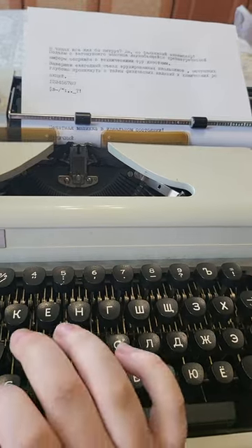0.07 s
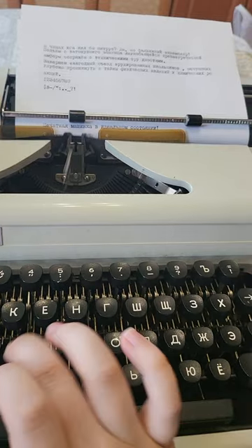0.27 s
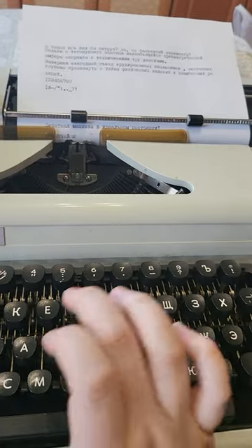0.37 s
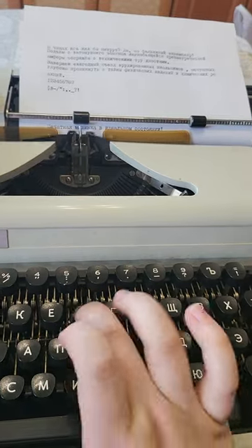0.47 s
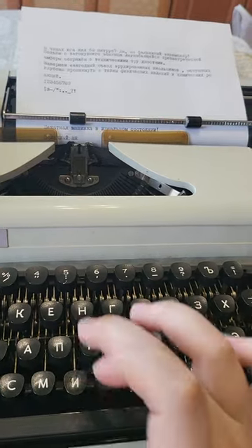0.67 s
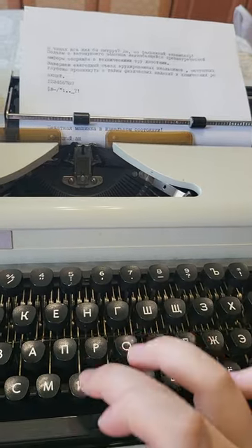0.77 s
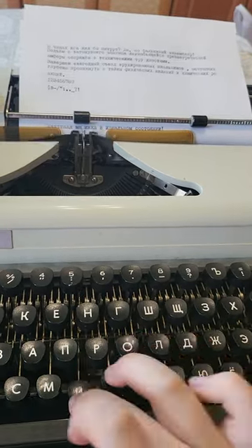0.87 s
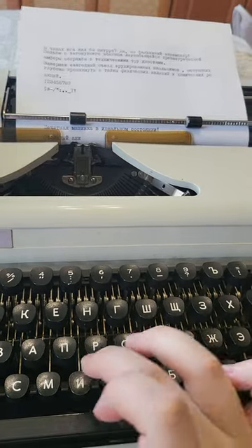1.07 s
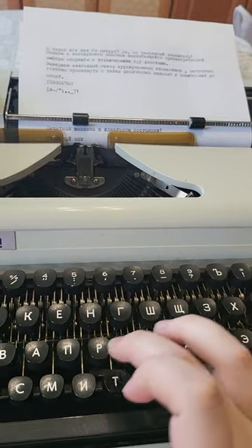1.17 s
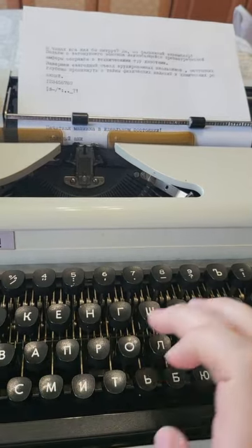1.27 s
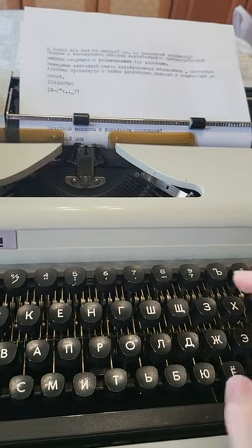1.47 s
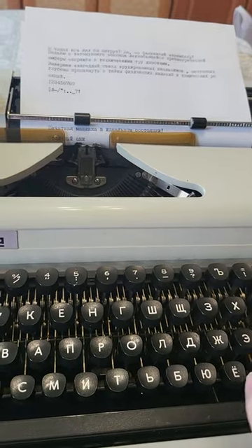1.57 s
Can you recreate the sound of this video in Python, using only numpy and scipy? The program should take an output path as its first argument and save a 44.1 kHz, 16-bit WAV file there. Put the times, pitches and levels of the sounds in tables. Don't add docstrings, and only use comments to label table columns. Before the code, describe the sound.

Three sharp manual typewriter keystrokes, spaced apart, with metallic clacks and soft release clicks, close up

```python
import sys
import numpy as np
from scipy import signal
from scipy.fft import rfft, irfft
from scipy.io import wavfile
from scipy.ndimage import uniform_filter1d

SR = 44100
rng = np.random.default_rng(int(sys.argv[2]) if len(sys.argv) > 2 else 0)


def boost(x):
    u = np.asarray(x, float) / 20
    return 10 ** u


def wrap_up_sound(samples):
    columns = np.atleast_2d(samples).T
    tamed = np.clip(columns, -1, 1)
    steps = np.round(tamed * 32767).astype(np.int16)
    wavfile.write(sys.argv[1], SR, steps)


N = 70560

# (time [s], peak level [dB])
STRIKES = [
    (0.2233, -5),
    (.5392, -3.5),
    (.9436, -4.5),
]
# (time [s], peak level [dB])
BOUNCES = [(0.2328, -18), (0.246, -18.5), (0.256, -19.5), (.277, -22), (0.5476, -23), (0.5553, -28),
           (0.5619, -20), (0.9492, -25), (0.953, -21), (0.9635, -21), (0.967, -22)]
# (time [s], peak level [dB])
PRESSES = [
    (0.187, -31),
    (0.4973, -35.5),
    (0.9077, -34),
]
# (time [s], peak level [dB])
KNOCKS = [
    (0.3776, -27),
    (.383, -30),
    (0.6947, -30),
    (1.081, -29),
]


def evened(x):
    return x / np.sqrt(np.mean(x ** 2) + 1e-20)


def read(points, hz):
    f, value = np.transpose(points)
    return np.interp(np.log(hz + 1), np.log(f + 1), value)


def add(mix, s, sound):
    part = mix[..., round(s * SR):][..., :sound.shape[-1]]
    part += sound[..., :part.shape[-1]]


def shaped(x, points, share=1):
    size = x.shape[-1]
    gain = boost(share * read(points, np.fft.rfftfreq(size, 1 / SR)))
    return irfft(rfft(x) * gain, size)


def resonate(x, peaks, broad_db):
    out = boost(broad_db) * x
    for k, (hz, width, db) in enumerate(peaks):
        r = np.exp(-np.pi * width / SR)
        poles = [1, -2 * r * np.cos(2 * np.pi * hz / SR), r * r]
        out = out + (-1) ** k * boost(db) * (1 - r) * signal.lfilter([1, 0, -1], poles, x)
    return out


def pair(size):
    same = 0.6
    a, b = rng.standard_normal((2, size))
    return np.array([a, same * a + np.sqrt(1 - same ** 2) * b])


def clicks(table, peaks, rise_s, t60, broad_db, hold_s=0, snap=0):
    t, out = np.arange(1500) / SR, np.zeros((2, N))
    envelope = np.minimum(t / rise_s, 1) * boost(-60 * np.maximum(t - rise_s - hold_s, 0) / t60)
    pulse = snap * np.exp(-((t - rise_s) * SR) ** 2)
    for s, db in table:
        spectra = rfft(pulse + pair(len(t)) * envelope)
        even = spectra / np.sqrt(uniform_filter1d(abs(spectra) ** 2, size=25, axis=1) + 1e-9)
        one = resonate(irfft(even, len(t)), peaks, broad_db)
        add(out, s, boost(db) * one / abs(one).max())
    return out


def ring(hz, db, t60, rise_s):
    t = np.arange(SR) / SR
    phase = rng.random() + rng.uniform(-0.25, 0.05, (2, 1))
    return boost(db - 60 * t / t60) * (1 - np.exp(-t / rise_s)) * np.sin(2 * np.pi * (hz * t + phase))


def air():
    # (frequency [Hz], density [dB])
    hiss = [(25, -30), (50, -19), (700, -18), (4300, -27), (5000, -35), (5800, -27), (7800, -31),
            (8300, -68)]
    # (centre [Hz], width [Hz], height [dB])
    bumps = [(47.15, 24, 23), (190.3, 45, 14), (400, 170, 13.5), (1290, 45, 11), (2105, 440, 1.8),
             (2940, 250, 4.4), (3360, 130, 3.7), (6100, 600, 2)]
    # (frequency [Hz], correlation [-1..1])
    likeness = [(60, 1), (380, 0.25), (2380, -0.66), (15000, 0.34)]
    # (frequency [Hz], level [dB])
    mains = [
        (50, -62),
        (202, -69),
        (421, -74.5),
    ]
    level_db, patch_db, early_db, settle_s = -60, 1.3, 5.5, 1.0
    frames, hz = N // 256 + 5, np.fft.rfftfreq(1024, 1 / SR)
    a, b, c, d, patches = rng.standard_normal((frames, 513, 5)).T
    patches = uniform_filter1d(patches, size=8, axis=0)
    patches = evened(uniform_filter1d(patches, size=10, axis=1))
    same = np.clip(read(likeness, hz), -1, 1)[:, None]
    left = a + 1j * b
    z = np.array([left, same * left + np.sqrt(1 - same ** 2) * (c + 1j * d)])
    bumps_db = sum(db / (1 + (2 * (hz - f) / width) ** 2) for f, width, db in bumps)
    early = np.outer(hz > 1800, np.arange(frames) * 256 / SR < settle_s)
    z = z * boost((read(hiss, hz) + bumps_db)[:, None] + patch_db * patches + early_db * early)
    noise = signal.istft(z, nperseg=1024, noverlap=768)[1][:, :N]
    t = np.arange(N) / SR
    hum = sum(boost(db) * np.sin(2 * np.pi * (f * t + rng.random())) for f, db in mains)
    return hum + boost(level_db) * evened(noise)


def room(x, decay):
    # (frequency [Hz], t60 [s])
    band_t60 = [(150, 1), (700, 0.41), (1840, 0.38), (4850, 0.33), (9000, 0.33), (12800, 0.27)]
    rise_s = 0.0064
    hz, t, z = signal.stft(rng.standard_normal((2, SR)), SR, nperseg=256)
    fade = boost(-60 * t / decay / read(band_t60, hz)[:, None])
    tail = signal.istft(z * fade, SR, nperseg=256)[1][:, :SR]
    tail = tail * (1 - np.exp(-(np.arange(SR) / SR / rise_s) ** 3))
    return signal.fftconvolve(x, tail / np.linalg.norm(tail[0]), axes=1)[:, :N]


def reflections(loud, soft):
    # (frequency [Hz], level [dB])
    answer = [(600, -27.5), (1250, -5), (1750, -10.5), (2250, 4.5), (4000, -13.5), (7200, -9),
              (9700, -36.5), (13000, -17)]
    bursts = clicks(STRIKES + BOUNCES, [], rise_s=0.00046, t60=0.01, broad_db=0)
    spread = shaped(bursts, answer, share=0.67)
    wet = room(boost(9) * spread + boost(-7.0) * loud, 1) + room(boost(1) * soft, 0.64)
    return wet * boost([[-0.8], [0.8]])


def ports(x):
    # (frequency [Hz], level [dB])
    lean = [(60, 4), (550, -1), (1400, 3.5), (2600, -9.5), (4500, -1.5), (15000, 0.5)]
    lag = 21
    return np.array([shaped(x[0], lean, 1.0), np.roll(shaped(x[1], lean, -0.44), lag)])


def desk():
    # (time [s], peak level [dB], pitch [Hz])
    thuds = [(0.189, -32, 177), (0.204, -42, 90.5), (.223, -24, 79.5), (0.251, -48, 113),
             (0.278, -36.5, 64.4), (.33, -36, 96.5), (0.358, -30.5, 79.6), (0.398, -55, 125),
             (0.503, -42.5, 133), (0.539, -27.5, 79), (0.577, -40, 108), (0.612, -40, 157),
             (0.637, -35, 59), (0.67, -33.5, 84.6), (0.722, -35.5, 70.4), (0.738, -57, 120.4),
             (0.799, -42, 55), (0.888, -40, 60.8), (0.914, -35.5, 75), (0.944, -30.5, 115),
             (0.971, -33.5, 68.6), (0.989, -36, 95), (1.045, -34.5, 83.8), (1.084, -36.5, 126),
             (1.15, -52, 49.4), (1.2, -57, 47.7), (1.249, -63.5, 50.1)]
    t, out = np.arange(6000) / SR, np.zeros((2, N))
    push_env = boost(-60 * t / 0.07) * (1 - np.exp(-(t / 0.0057) ** 2))
    wood_env = boost(-60 * t / 0.28) * (1 - np.exp(-t / 0.0011))
    for s, db, hz in thuds:
        phase = 0.15 * rng.standard_normal((2, 1))
        push = np.sin(2 * np.pi * (hz * t + phase)) * push_env
        panel = [(hz * 1.5, 60, 2), (370, 90, -5), (560, 150, -12)]
        wood = evened(resonate(pair(len(t)), panel, broad_db=-70)) * wood_env
        add(out, s, boost(db) * (1.56 * push + 0.4 * wood))
    return out


def spring():
    # (time [s], peak level [dB], t60 [s])
    songs = [
        (.72, -45, .09),
        (.765, -56, .1),
        (.822, -59, .09),
        (1.106, -42, .1),
        (1.15, -55, .12),
        (1.195, -62, .16),
    ]
    out = np.zeros((2, N))
    for s, db, t60 in songs:
        add(out, s, ring(1960, db, t60, rise_s=0.00068))
    return out


def case():
    # (frequency [Hz], level [dB], t60 [s])
    modes = [(380, -19, .15), (1200, -16, .3), (1400, -13, .3), (1485, -10, .12), (2030, -7, .33),
             (2053, -8, .33), (2121, -10, .2), (2162, -3, .2), (2300, -6, .28), (2364, -7, .28),
             (2450, -8, .3), (2720, -8, .2), (3192, -5, .25), (3338, -9, .2)]
    out = np.zeros((2, N))
    for s, db in STRIKES:
        for hz, mode_db, t60 in modes:
            pitch = hz * rng.uniform(0.99, 1.001)
            add(out, s, ring(pitch, db - 23 + mode_db, t60, rise_s=0.007))
        add(out, s, ring(1297, -66, 2.5, rise_s=0.03))
    return out


def rest_ring():
    # (frequency [Hz], level [dB], t60 [s])
    modes = [(1007, -23, .1), (1255, -22, .2), (2800, -24, .3), (2896, -23, .17)]
    out = np.zeros((2, N))
    for s, db in KNOCKS:
        for hz, mode_db, t60 in modes:
            add(out, s, ring(hz, db + mode_db, t60, rise_s=0.0013))
    return out


def linkage():
    # (frequency [Hz], level [dB])
    rattle = [(180, -30.5), (300, -4), (4240, -10), (4690, -16.5), (5100, -5), (7260, -7.5), (14000, -17.5),
              (16500, -21.5)]
    level_db, rise_db, dip_db = -42, 9, -12
    out = np.zeros((2, N))
    for (start, _), (end, _) in zip(PRESSES, STRIKES):
        u = np.linspace(0, 1, round((end - start) * SR))
        grit = boost(3.0 * evened(uniform_filter1d(rng.standard_normal(len(u)), size=30)))
        level = boost(level_db + dip_db * np.sin(np.pi * u) + rise_db * u ** 3) * np.minimum(8 * u, 1)
        add(out, start, level * evened(shaped(pair(len(u)) * grit, rattle)))
    return out


def knocks():
    # (frequency [Hz], width [Hz], level [dB])
    rest = [(1010, 180, 3.5), (1280, 370, 1.5), (1788, 480, -4), (2888, 350, 1.5), (4070, 2100, -14.5),
            (7310, 620, -9.5)]
    return clicks(KNOCKS, rest, rise_s=0.0017, t60=0.02, broad_db=-17.5)


def ticks():
    # (time [s], peak level [dB])
    falls = [
        (0.3728, -28.5),
        (.689, -30.5),
        (0.698, -31),
        (0.658, -38.5),
        (0.743, -44),
        (1.0795, -33.5),
        (1.092, -33.5),
    ]
    # (frequency [Hz], width [Hz], level [dB])
    metal = [(3380, 1200, -19), (7100, 200, 5), (9460, 230, -1), (11600, 2000, -2.5), (13700, 630, -5),
             (14800, 470, -5)]
    return clicks(falls, metal, rise_s=0.0003, t60=0.0199, broad_db=-10)


def key_taps():
    # (frequency [Hz], width [Hz], level [dB])
    key_tops = [
        [(1450, 200, -3), (2880, 460, -1.5), (4650, 220, -5.5), (5500, 200, 0), (6100, 460, -0.5),
         (11500, 320, -6.5), (13800, 490, -6)],
        [(4570, 280, -5), (7740, 530, -1.5), (9380, 260, -5.5), (9900, 180, -7), (11800, 350, -2),
         (13500, 280, -10.5), (15000, 230, -13)],
        [(1390, 260, -2), (3540, 420, 0), (5900, 260, 0.5), (7150, 230, -1), (9520, 510, -15),
         (11800, 560, -4.5), (13600, 460, -9)],
    ]
    return sum(clicks([press], key, rise_s=0.0018, t60=0.04, broad_db=-24.5)
               for press, key in zip(PRESSES, key_tops))


def grazes():
    # (time [s], peak level [dB])
    touches = [
        (.2192, -22),
        (.5350, -24),
        (.9402, -24),
    ]
    # (frequency [Hz], width [Hz], level [dB])
    guide = [(2400, 900, -4.5), (4300, 990, -4), (6640, 370, -2.5), (12860, 900, -7.5)]
    return clicks(touches, guide, rise_s=0.00088, t60=0.057, broad_db=-19.5)


def chinks():
    # (time [s], peak level [dB])
    touches = [(.2325, -18), (.2468, -22), (.2544, -33.5), (.2778, -39), (.5490, -21), (.5622, -16),
               (.953, -16), (.9655, -21), (.9675, -19), (.973, -24.5)]
    # (frequency [Hz], width [Hz], level [dB])
    bars = [(2306, 690, -9), (6400, 400, -11), (12200, 890, 4), (14600, 900, -9)]
    return clicks(touches, bars, rise_s=0.0011, t60=0.0063, broad_db=-30.5)


def bounces():
    # (frequency [Hz], width [Hz], level [dB])
    rebound = [(2320, 130, -3), (3270, 470, 0), (6370, 910, -4), (12450, 430, -4.5), (14800, 360, -15.5)]
    return clicks(BOUNCES, rebound, rise_s=0.00096, t60=0.034, broad_db=-27.5)


def slaps():
    # (frequency [Hz], width [Hz], level [dB])
    slug = [(620, 300, -15), (1150, 300, -10), (1480, 350, 2), (2580, 800, 1), (3400, 350, -4),
            (4320, 500, 0), (5250, 450, -6), (6400, 600, -4), (7400, 900, 1), (9400, 900, -16),
            (12800, 600, -3), (15200, 700, -11)]
    return clicks(STRIKES, slug, rise_s=0.0003, t60=0.006, broad_db=-22.5, hold_s=0.0017, snap=4)


def scene():
    loud = slaps() + bounces() + grazes() + chinks()
    soft = key_taps() + ticks() + knocks() + linkage()
    ringing = case() + rest_ring() + spring()
    direct = ports(boost(3.5) * loud + boost(7.5) * soft + ringing)
    return direct + reflections(loud, soft) + desk() + air()


def roll_off(x):
    return signal.sosfilt(signal.butter(12, 16800, fs=SR, output="sos"), x)


def record(dry):
    low = signal.sosfilt(signal.butter(2, 22, "highpass", fs=SR, output="sos"), dry)
    bent = np.tanh(low * 0.9) / 0.9
    edge = signal.firwin(151, 16100, window=("kaiser", 9), fs=SR)
    return roll_off(signal.oaconvolve(bent, edge[None], "same"))


dry = scene()
out = record(dry)
wrap_up_sound(out)
```